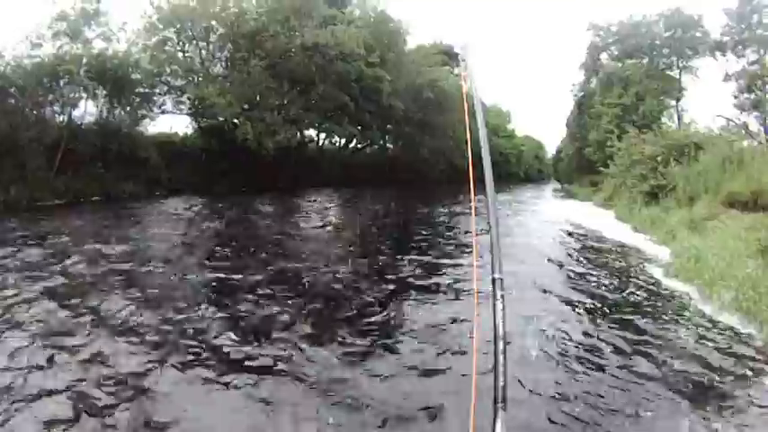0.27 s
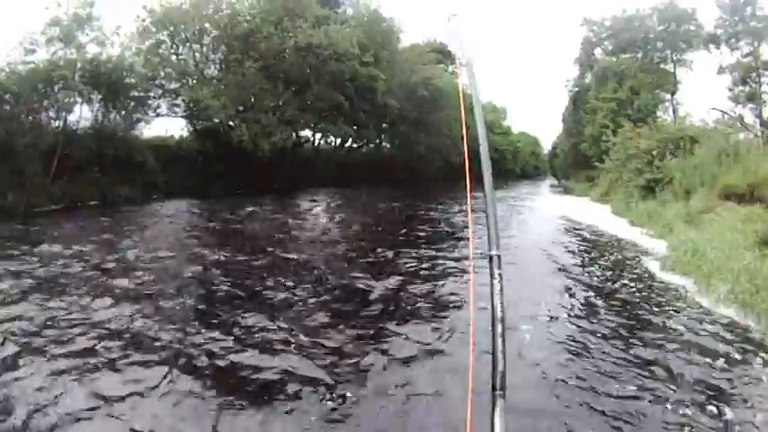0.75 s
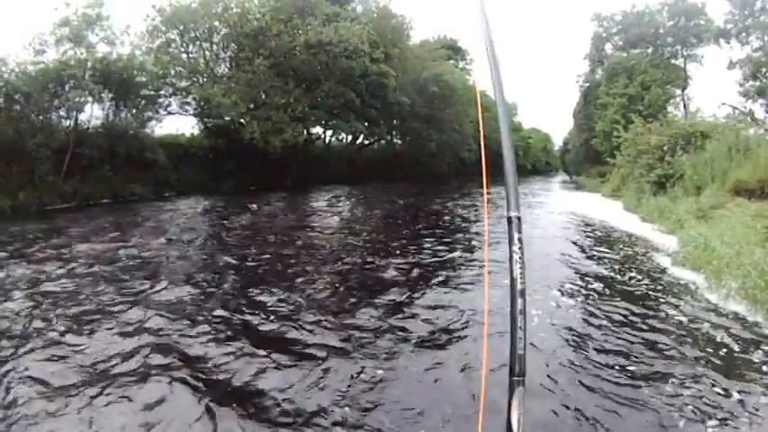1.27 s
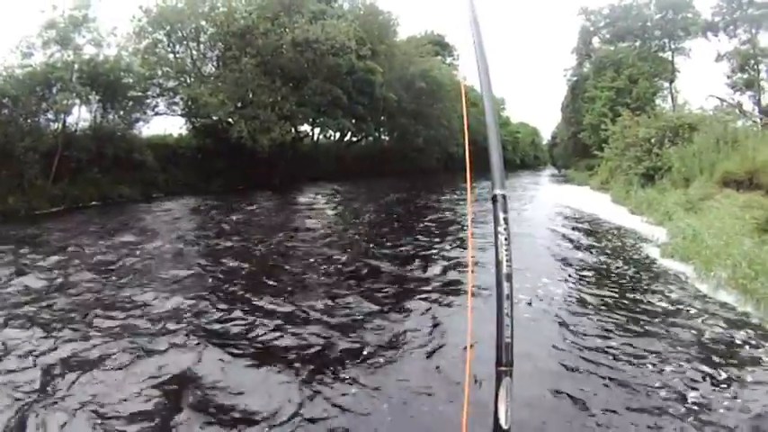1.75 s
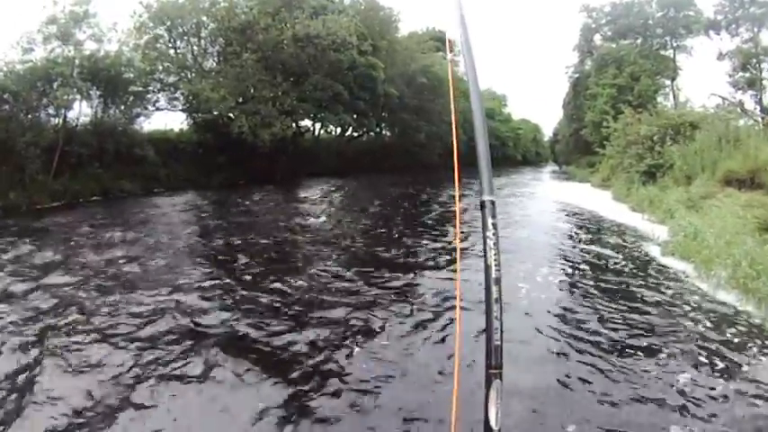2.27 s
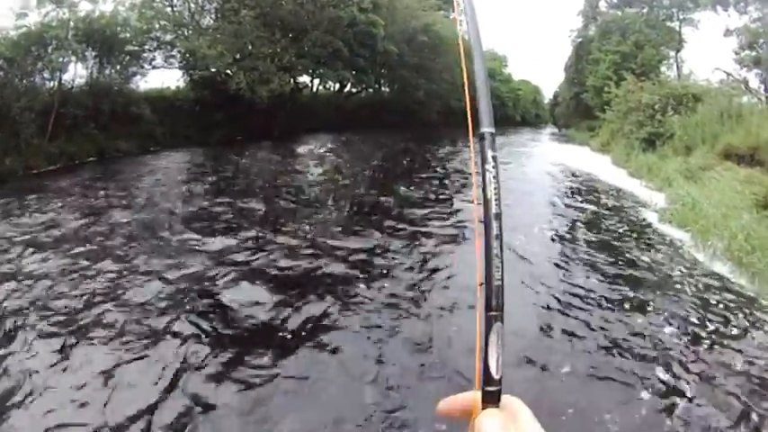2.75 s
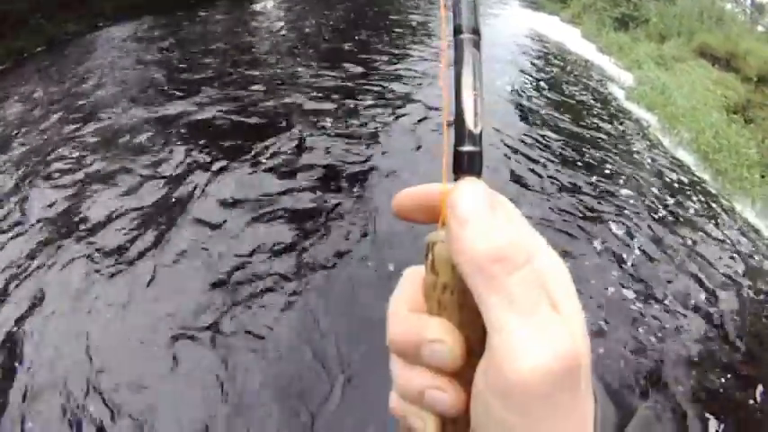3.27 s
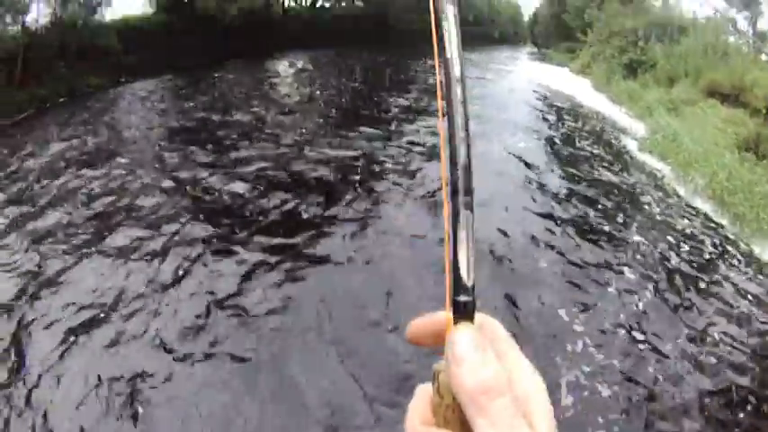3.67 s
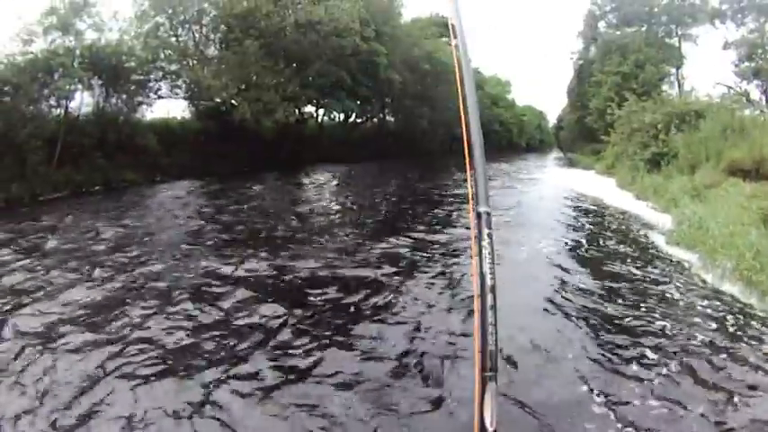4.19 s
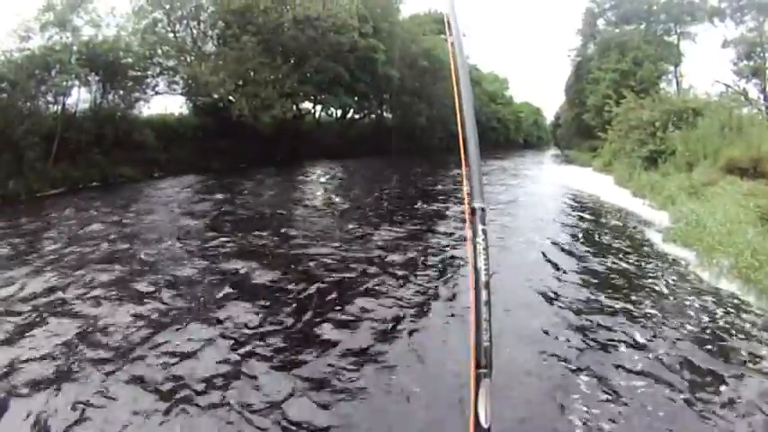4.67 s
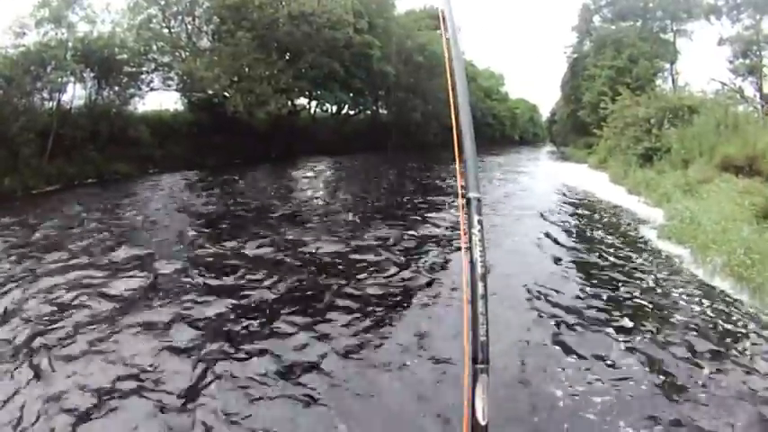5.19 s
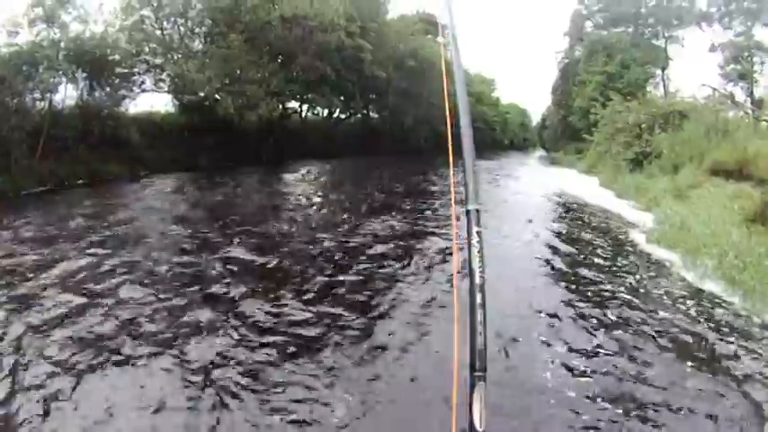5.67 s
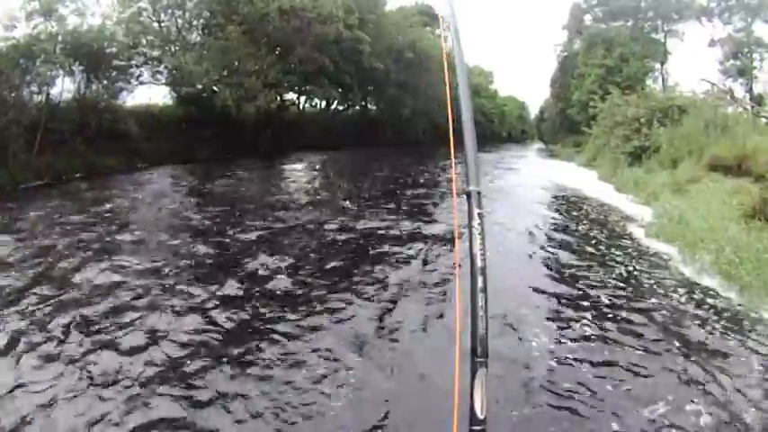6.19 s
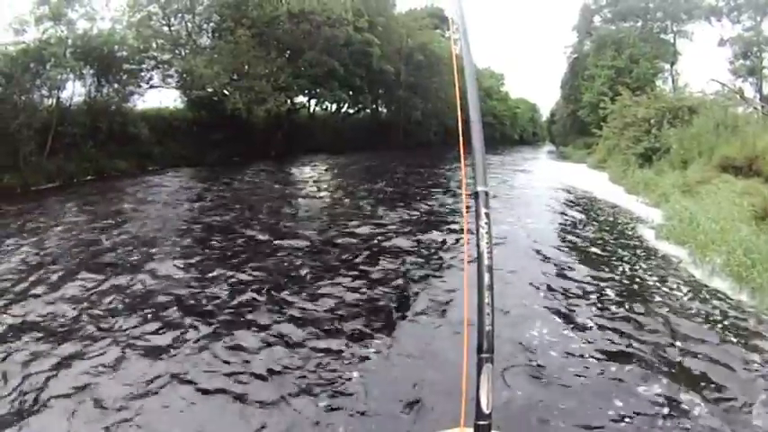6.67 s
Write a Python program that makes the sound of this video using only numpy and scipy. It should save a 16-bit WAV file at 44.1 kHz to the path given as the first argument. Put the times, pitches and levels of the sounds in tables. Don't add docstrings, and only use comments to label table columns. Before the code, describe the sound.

A fly reel clicks, then whirs into a bright, surging metal rattle as line runs out, with handling taps and quiet water behind.

```python
import sys
import numpy as np
from scipy import signal
from scipy.fft import rfft, irfft, next_fast_len
from scipy.io import wavfile
from scipy.ndimage import uniform_filter1d

SR = 44100
rng = np.random.default_rng(int(sys.argv[2]) if len(sys.argv) > 2 else 0)


def voltage_ratio(level):
    return 10 ** (np.asarray(level, float) / 20)


def unload_audio(sound):
    columns = np.transpose(np.atleast_2d(sound))
    steps = np.round(np.clip(columns, -1, 1) * 32767)
    wavfile.write(sys.argv[1], SR, steps.astype(np.int16))


N = 306051
TEETH = 32
RUN_S = 1.5511

# (frequency [Hz], ring [ms], level [dB], swing once a turn [dB], its place [turns],
# swing twice a turn [dB], its place [turns])
FRAME = [(1286, 0.34, -17, 2, 0.16, 0.5, 0.25), (1597, 0.49, -21.5, 1.5, 0.71, -4.5, 0.26),
         (2660, 1, -25, 1.5, 0.37, 1.0, 0.01), (2950, 0.98, -32.5, 13, 0.4, 7, 0.17),
         (3601, 0.79, -9, 4.5, 0.21, 2.8, 0.45), (3992, 0.47, -2.5, 0.5, 0.96, 5, 0.23),
         (4530, 0.65, -4.5, 4, 0.86, 1.6, 0.53), (4967, 0.51, -3.5, -2, 0.67, 0.2, 0.17),
         (5455, 0.69, 0, 0.7, 0.9, 2, 0.18), (6048, 0.39, 1.05, 2.5, 0.99, 1.45, 0.037)]
SPOOL = [(6530, 0.66, -8, 6.5, 0.22, 4.5, 0.44), (6865, 0.59, -9.5, 3, 0.54, 5.5, 0.17),
         (7240, 0.61, -11, -1, 0.77, 3, 0.19), (8520, 0.41, -12, -5.5, 0.44, -1.5, 0.05),
         (8424, 0.4, 3.5, 2.06, 0.6, 0.55, 0.61), (8750, 0.59, -8.5, -10.5, 0.69, 8.5, 0.44),
         (9420, 0.6, -10.5, 3, 1.0, 2.5, 0.21), (9780, 0.4, -9, 0, 0.82, 2.5, 0.32),
         (10390, 0.48, -12.5, 2.5, 0.84, 3.5, 0.55), (11390, 0.52, -17.5, 1, 0.38, 1, 0.022)]
ROD = [(1340, 1.85, -18, 1.9, 0.24, 2.4, 0.46), (1625, 1.44, -22, 1.2, 0.54, 1.7, 0.3),
       (3410, 2, -24, 1.0, 0.18, .5, 0.7)]
RINGS = FRAME + SPOOL + ROD
RING_HZ = np.array(RINGS)[:, 0]
# (frequency [Hz], level [dB per Hz])
RUSTLE = [(300, -3.5), (800, -5), (1500, -2.5), (2500, -10.5), (5000, -3.5), (9000, -20), (14000, -58)]


def curve(table):
    s, *columns = np.transpose(table)
    return [np.interp(np.arange(N) / SR, s, c) for c in columns]


def colour(table, hz):
    table_hz, db = np.transpose(table)
    return np.interp(np.log(hz + 1e-9), np.log(table_hz), db, left=-90, right=-90)


def walk(rate):
    k = int(SR / rate)
    steps = np.repeat(rng.standard_normal(N // k + 1), k)
    return 1.3 * uniform_filter1d(uniform_filter1d(steps, k), k)[:N]


def hiss(table, flicker_db, rate, grit_db):
    size = next_fast_len(N)
    hz = np.arange(size // 2 + 1) * SR / size
    bursts = np.minimum(rng.exponential(size=N // 16 + 1), 4)
    grit = voltage_ratio(grit_db * np.repeat(bursts, 16)[:N])
    wave = rfft(rng.standard_normal(N) * grit, size) * voltage_ratio(colour(table, hz))
    octave = np.log2(hz / 30 + 1e-9)
    out = np.zeros(N)
    for k in range(11):
        band = irfft(wave * np.clip(1 - abs(octave - k), 0, 1), size)[:N]
        out += voltage_ratio(flicker_db * walk(rate)) * band
    return out / np.sqrt(np.mean(out ** 2))


def swells(s, hold, db, floor_db, rise_db, fall_db):
    t = np.arange(0, N + 128, 128) / SR
    s, hold, db = (np.array(c)[:, None] for c in (s, hold, db))
    each = voltage_ratio(db - rise_db * np.clip(s - t, 0, 1) - fall_db * np.clip(t - s - hold, 0, 1))
    total = np.sqrt(voltage_ratio(floor_db) ** 2 + np.sum(each ** 2, axis=0))
    return np.interp(np.arange(N) / SR, t, total)


def add(out, times, grains):
    at = (np.asarray(times) * SR).astype(int)[:, None] + np.arange(grains.shape[1])
    np.add.at(out, at[at < N], grains[at < N])
    return out


def river():
    # (frequency [Hz], level [dB per Hz])
    water_colour = [(15, -36), (25, 2), (102, -10), (223, -11), (416, -4.5), (1070, -4.5), (1260, -7.5),
                    (1370, -10), (2050, -13), (4740, -17), (12200, -21), (14800, -24), (16000, -34)]
    # (time [s], frequency [Hz], peak [dB], length [s], upward glide [share])
    bubbles = [
        (0.553, 610, -57, 0.021, .15),
        (.585, 845, -59, 0.016, 0.23),
        (0.782, 1490, -59, 0.016, 0.13),
        (1.528, 1030, -61.5, .015, 0.089),
        (2.087, 434, -54.5, 0.031, .15),
        (4.6, 350, -59, 0.039, 0.38),
    ]
    s, hz, db, length, glide = np.array(bubbles).T[:, :, None]
    u = np.clip(np.arange(4096) / SR / length, 0, 1)
    tone = np.sin(np.pi * u) * np.sin(2 * np.pi * hz * length * (u + glide * u ** 2 / 2))
    water = hiss(water_colour, flicker_db=0.7, rate=12, grit_db=1.2)
    return add(voltage_ratio(-63) * water, s[:, 0], voltage_ratio(db) * tone)


def wind():
    # (time [s], hold [s], rumble [dB], low thud [dB])
    gusts = [(0.038, 0.083, -59, -55.5), (.41, 0.095, -65.5, -61.5), (0.608, 0.073, -60.5, -73),
             (0.908, 0.36, -66.5, -66.5), (1.36, 0.027, -69, -58.5), (1.475, .03, -54, -69),
             (1.543, 0.016, -59.5, -54.5), (1.994, .03, -71, -64), (2.335, 0.073, -53.5, -57.5),
             (2.644, 0.041, -53.5, -55), (2.843, 0.2, -51.5, -57), (2.98, 0.018, -50.5, -51),
             (3.081, 0.017, -53.5, -50.5), (3.147, 0.018, -54, -52), (3.26, 0.016, -56.5, -54.5),
             (3.5, .01, -62.5, -73), (3.649, 0.056, -54.5, -54), (3.746, .19, -50, -53),
             (4.12, .03, -61, -64), (4.357, .01, -63.5, -65), (4.98, .01, -63, -81), (5.16, .01, -92, -60),
             (5.333, .02, -63.5, -62), (5.57, .01, -66.5, -63), (5.675, .01, -62.5, -71),
             (5.92, 0.32, -68.5, -69), (6.586, 0.023, -63.5, -59), (6.797, 0.029, -61, -57)]
    # (frequency [Hz], level [dB per Hz])
    rumble_colour = [(100, -41), (170, 0), (452, -3), (506, -4), (655, -4.5), (789, -13), (1000, -13.5),
                     (1300, -24), (2200, -120)]
    # (frequency [Hz], level [dB per Hz])
    thud_colour = [(15, -36), (25, -9), (64, -7), (103, 2.5), (170, -8), (220, -53), (370, -120)]
    s, hold, rumble_db, thud_db = np.transpose(gusts)
    rumble = hiss(rumble_colour, flicker_db=3.5, rate=45, grit_db=-1.4)
    rumble *= swells(s, hold, rumble_db, floor_db=-71, rise_db=168, fall_db=226)
    thud = hiss(thud_colour, flicker_db=3.5, rate=25, grit_db=0.2)
    thud *= swells(s, hold, thud_db, floor_db=-70.5, rise_db=168, fall_db=226)
    return rumble + thud


def sleeve():
    # (time [s], hold [s], level [dB])
    rubs = [
        (.65, 0.13, -68.5),
        (2.1, .02, -60.5),
        (2.375, .03, -63),
        (2.637, .02, -61),
        (2.846, 0.033, -60),
        (2.907, 0.025, -52),
        (3.05, .25, -63.5),
        (3.39, 0.022, -61.5),
        (3.74, 0.025, -47),
        (5.6, 0.42, -71),
    ]
    rustle = hiss(RUSTLE, flicker_db=1.0, rate=40, grit_db=3.0)
    muffled = signal.sosfilt(signal.butter(2, 4500, fs=SR, output="sos"), rustle)
    return muffled * swells(*np.transpose(rubs), floor_db=-68.5, rise_db=113, fall_db=103)


def line():
    running = np.arange(N) > RUN_S * SR
    return voltage_ratio(-67.5) * running * hiss(RUSTLE, flicker_db=1.0, rate=40, grit_db=3.0)


def taps():
    # (time [s], peak [dB], frequency [Hz], time to fall 60 dB [s])
    knocks = [
        (2.035, -44, 2500, .01),
        (2.639, -34.5, 1210, 0.015),
        (2.766, -38.5, 1090, 0.021),
        (3.258, -43, 610, 0.023),
        (3.498, -37.5, 705, 0.014),
        (4.982, -56, 500, .02),
    ]
    s, db, hz, t60 = np.array(knocks).T[:, :, None]
    t = np.arange(1024) / SR
    knock = np.sin(2 * np.pi * hz * t) * voltage_ratio(-60 * t / (t60 * 0.64))
    knock += 0.45 * np.sin(2 * np.pi * 0.314 * hz * t) * voltage_ratio(-60 * t / (t60 * 2))
    knock += 0.6 * np.sin(2 * np.pi * 1.9 * hz * t) * voltage_ratio(-60 * t / (t60 * 0.3))
    nail = 0.74 * np.sin(2 * np.pi * 1700 * t) * np.exp(-t / 0.00039)
    onset = np.minimum(t / 0.00048, 1)
    return add(np.zeros(N), s[:, 0], voltage_ratio(db) * (knock + nail) * onset)


def pawl(turns, mode_db, damping, scatter_db, detune, chatter_db, chatter_ms, lag_ms,
         echo_db, echo_ms, echo_t60_ms):
    # (frequency [Hz], level [dB per Hz])
    scrape_colour = [(2000, -28), (3500, -11), (6000, -4), (10000, 1.5), (12300, -6.5), (13300, -1.5),
                     (14500, -13), (15800, -17)]
    ms = np.arange(640) / SR * 1000
    wear = rng.standard_normal((TEETH, len(RINGS), 4))
    wear = np.sqrt(2) * uniform_filter1d(wear, size=2, axis=0, mode="wrap")
    tooth = np.round(turns * TEETH).astype(int) % TEETH
    fresh = rng.standard_normal((2, len(turns), len(RINGS), 4))
    strike = 0.65 * wear[tooth] + 1.3 * uniform_filter1d(fresh[0], size=4, axis=0) + 0.3 * fresh[1]
    start_phase = rng.uniform(0, 2 * np.pi, len(RINGS))
    out = np.zeros((len(turns), len(ms)))
    for k, (hz, ring, db, once_db, once, twice_db, twice) in enumerate(RINGS):
        ring = ring / damping
        swing = once_db * np.cos(2 * np.pi * (turns - once))
        swing += twice_db * np.cos(4 * np.pi * (turns - twice))
        gain = voltage_ratio(db + mode_db[:, k] + swing + scatter_db * strike[:, k, 0])
        lag = lag_ms * (4000 / hz) * (1 + 0.48 * strike[:, k, 1:2])
        t = np.clip(ms - lag, 0, None) / ring
        phase = 2 * np.pi * hz / 1000 * (1 + detune * strike[:, k, 2:3]) * (ms - 2)
        phase += start_phase[k] + 1.2 * strike[:, k, 3:]
        out += gain[:, None] * t ** 2 * np.exp(-t) * np.sin(phase) / np.sqrt(ring)
    puff = rng.standard_normal(out.shape) * (ms / chatter_ms) ** 2
    puff *= np.exp(-ms / chatter_ms) / np.sqrt(chatter_ms)
    scrape = voltage_ratio(colour(scrape_colour, np.arange(321) * SR / 640))
    out += voltage_ratio(chatter_db) * irfft(rfft(puff) * scrape, 640)
    smear = rng.standard_normal(out.shape) * (ms > echo_ms) * voltage_ratio(-60 * (ms - echo_ms) / echo_t60_ms)
    smear *= voltage_ratio(echo_db) / np.sqrt(np.sum(smear ** 2, axis=1, keepdims=True))
    out = out + signal.fftconvolve(out, smear, axes=1)[:, :len(ms)]
    return out / np.sqrt(np.mean(out ** 2))


def drops():
    # (time [s], peak [dB], brightness [dB])
    single = [
        (0.168, -24.5, 0.5),
        (0.2066, -24, -3),
        (0.5303, -22.5, 3),
    ]
    # (frequency [Hz], level added [dB])
    turned = [(1500, -2), (3300, 6), (3600, 6), (4000, 6), (4900, 3), (5500, 3), (6100, -7), (6500, 6),
              (8500, -2), (11400, -2), (13200, 4)]
    s, peak_db, bright_db = np.transpose(single)
    held_db = colour(turned, np.clip(RING_HZ, 1600, 13000)) + np.outer(bright_db, RING_HZ > 7700)
    grains = pawl(np.arange(len(s)) / TEETH, held_db, damping=1.13, scatter_db=0.7, detune=0.011,
                  chatter_db=-7, chatter_ms=0.53, lag_ms=0.055, echo_db=-11.5, echo_ms=1.9, echo_t60_ms=13)
    grains /= abs(grains).max(axis=1, keepdims=True)
    return add(np.zeros(N), s - 0.0008, grains * voltage_ratio(peak_db + 2)[:, None])


def tooth_times():
    # (place [turns], speed [teeth/s], surge as the tight coil frees [log speed],
    # rebound of the rod tip [log speed])
    spool_turns = [(0, 73.8, -0.143, -0.252), (1, 81.39, 0.289, 0.175), (2, 122.39, 0.281, -0.006),
                   (3, 106.9, 0.799, 0.22), (4, 88.55, 0.59, 0.339), (5, 79.01, 0.13, 0.154),
                   (6, 77.75, 0.277, 0.68), (7, 96.85, 0.23, -0.383), (8, 71.0, -0.342, 0.161),
                   (9, 93.88, -0.235, 0.074), (10, 91.3, -0.096, -0.132), (11, 102.39, -0.004, -0.16),
                   (12, 93.01, 0.203, 0.195), (13, 96.18, 0.251, 0.382), (14, 80.43, 0.242, 0.267),
                   (15, 90.9, 0.116, 0.157), (16, 78.35, -0.0, -0.0)]
    jerks = [(0.857, 0.252), (1.187, 0.207), (2.915, -0.352), (3.473, -0.384), (3.535, 0.416),
             (5.111, 0.316), (5.493, 0.242), (5.906, 0.147), (6.396, -0.581), (6.767, -0.308),
             (7.043, -0.549), (7.521, -0.148), (7.991, 0.563), (8.975, 0.337), (9.497, -0.074),
             (9.984, 0.36), (10.563, -0.169), (11.227, 0.123), (12.046, 0.321), (12.839, 0.047),
             (13.762, 0.217), (14.157, 0.312), (14.582, 0.215), (14.87, 0.093)]
    turn, pace, coil, rebound = np.transpose(spool_turns)
    jerk_turn, jerk = np.transpose(jerks)
    turns = np.arange(TEETH * int(turn[-1])) / TEETH
    at = np.r_[turn - 0.0422, turn + 0.3307, jerk_turn]
    z = (turns[:, None] - at) / 0.1365
    surge = ((1 - 0.7292 * z ** 2) * np.exp(-z ** 2 / 2)) @ np.r_[coil, rebound, jerk]
    rate = np.interp(turns, turn, pace) * np.exp(surge)
    s = RUN_S + np.cumsum(1 / rate) - 1 / rate
    heard = s < N / SR
    return turns[heard], s[heard], rate[heard]


def ratchet():
    # (time [s], level [dB], tilt towards the treble [dB])
    held = [(1.55, -51, 4.5), (1.62, -47, -2), (1.85, -44.5, -1), (2.05, -44, 0.5), (2.5, -43.5, 0.5),
            (3.1, -42.5, 0), (3.56, -41, 0.5), (3.85, -44.5, -0.5), (4.08, -46, 1.5), (4.3, -44, -0.5),
            (5.5, -43.5, 0.5), (6.94, -43.5, -0.5)]
    # (time [s], lift [0-1])
    lift = [
        (0, 0),
        (2.6, 0.38),
        (2.9, 0.3),
        (3.1, 1),
        (3.7, 0.8),
        (3.9, 0),
        (4.1, 0.08),
        (6.94, 0.32),
    ]
    # (frequency [Hz], level added [dB])
    lifted = [(1400, -4), (2900, 7), (3600, 4), (4050, -5), (4550, -3.5), (5050, 2), (5500, -3.5),
              (6080, 3), (6520, -2), (7200, 4.5), (8450, -4), (9700, 3), (11400, 8), (14000, 1.4)]
    turns, s, rate = tooth_times()
    at = (s * SR).astype(int)
    level_db, tilt_db = (c[at] for c in curve(held))
    high = RING_HZ > 7700
    middle = (RING_HZ > 3800) & (RING_HZ < 5200)
    held_db = np.outer(tilt_db, high) - np.outer(0.3 * tilt_db + 3.0, middle)
    held_db += np.outer(curve(lift)[0][at], colour(lifted, np.clip(RING_HZ, 1500, 13000)))
    grains = pawl(turns + 1 / TEETH, held_db, damping=1.0, scatter_db=1.82, detune=0.009, chatter_db=-7.5,
                  chatter_ms=0.54, lag_ms=0.59, echo_db=-17.0, echo_ms=2.8, echo_t60_ms=4.4)
    gain = voltage_ratio(level_db) * np.sqrt(SR / grains.shape[1] / rate)
    return add(np.zeros(N), s, grains * gain[:, None])


def scene():
    background = river() + wind() + sleeve() + line() + taps()
    return np.tile(background + drops() + ratchet(), (2, 1))


def top_cut(x):
    return signal.sosfilt(signal.butter(12, 16490, fs=SR, output="sos"), x)


def record(dry):
    # (frequency [Hz], side minus mid [dB])
    unlike = [(20, -43), (60, -55), (180, -39), (350, -28), (700, -23.5), (1400, -23), (3000, -20),
              (10000, -24.5), (14000, -14), (17000, -15)]
    size = next_fast_len(N)
    hz = np.arange(size // 2 + 1) * SR / size
    whole = rfft(dry[0], size)
    trace = rfft(dry[0] * walk(400), size) * voltage_ratio(colour(unlike, hz))
    blocks = np.repeat(rng.random(N // 1024 + 1) < 0.55, 1024)[:N]
    side = irfft(trace * (hz < 2400), size)[:N]
    side += blocks * irfft(trace * (hz >= 2400), size)[:N]
    loud = uniform_filter1d(abs(np.gradient(dry[0])), size=128)[64::128]
    quiet = loud < 0.75 * uniform_filter1d(loud, size=9)
    between = quiet & (np.arange(len(loud)) * 128 > RUN_S * SR)
    chance = np.repeat(rng.random(len(loud) // 2 + 1), 2)[:len(loud)]
    for low_hz, high_hz, share in ((15000, SR, 0.75), (13700, 15000, 0.3)):
        lost = np.repeat(1.0 * (between & (chance < share)), 128)
        lost = uniform_filter1d(np.resize(lost, N), size=64)
        dry = dry - lost * irfft(whole * (hz > low_hz) * (hz <= high_hz), size)[:N]
    return top_cut(dry + np.array([side, -side]))


dry = scene()
out = record(dry)
unload_audio(out)
```